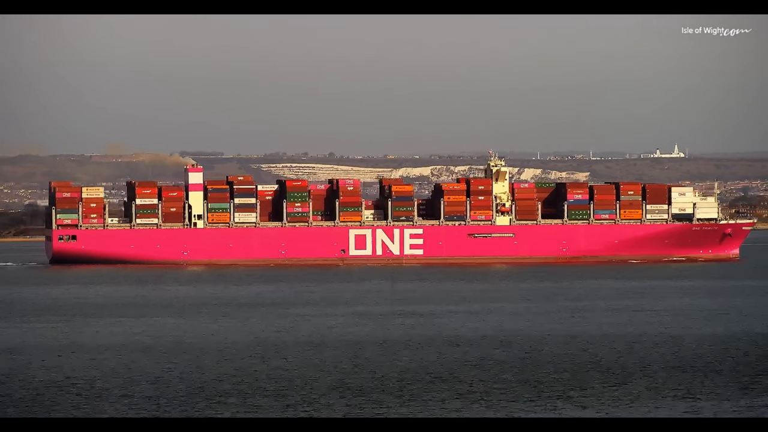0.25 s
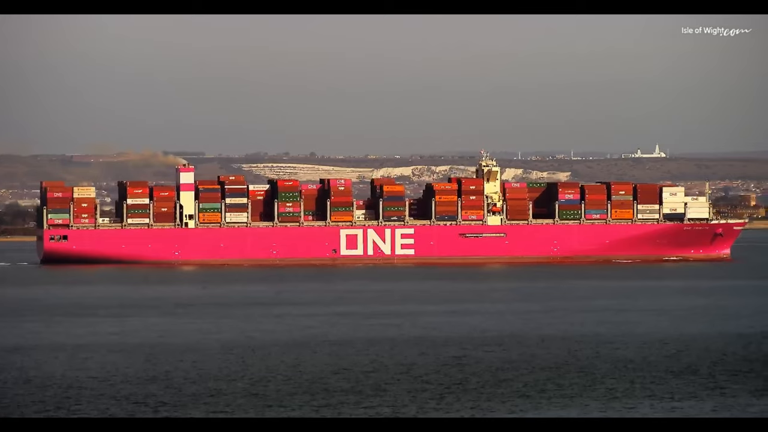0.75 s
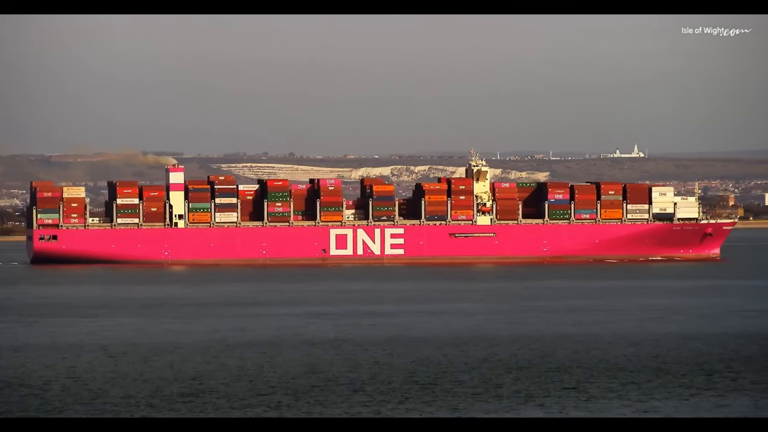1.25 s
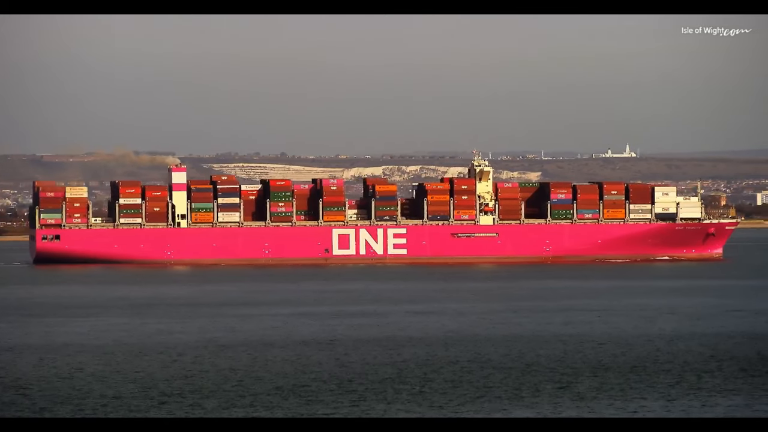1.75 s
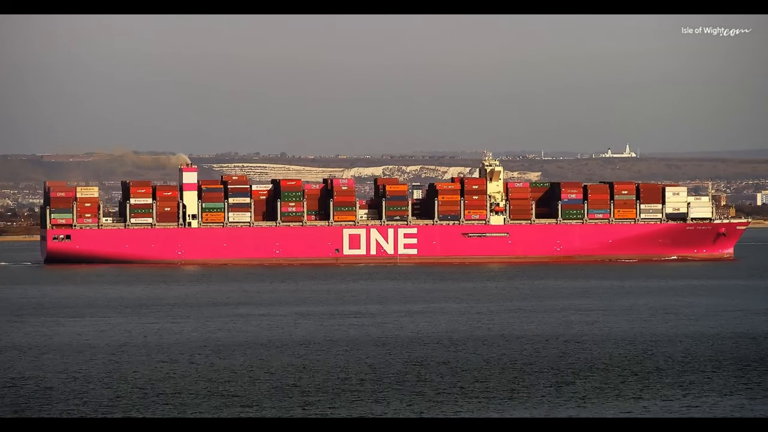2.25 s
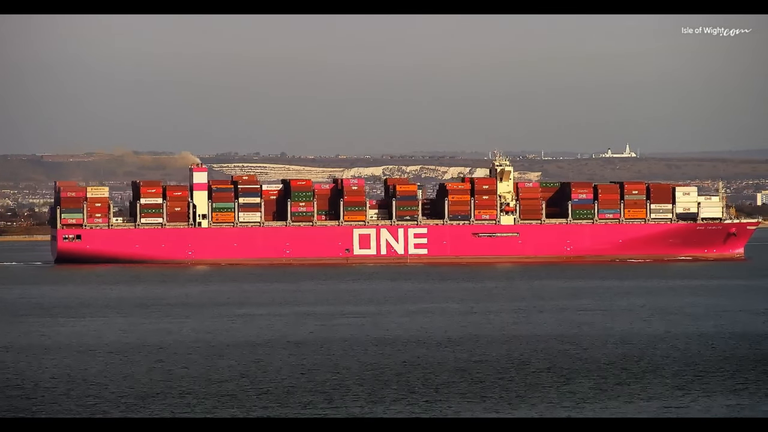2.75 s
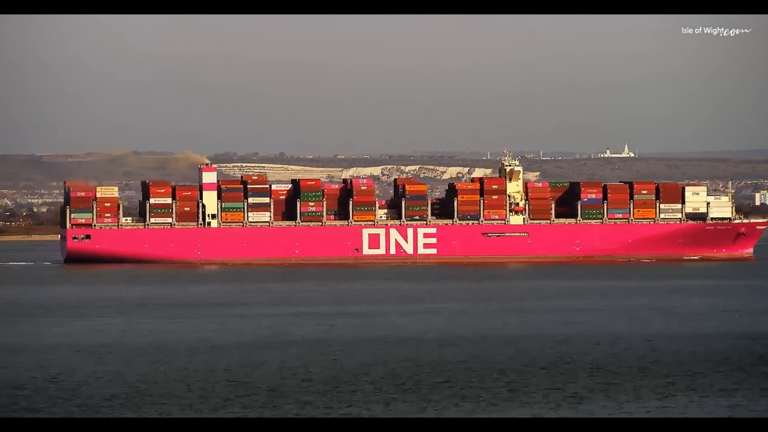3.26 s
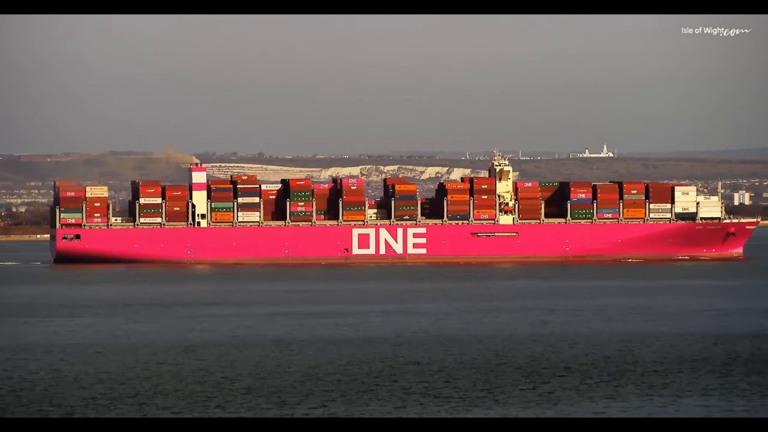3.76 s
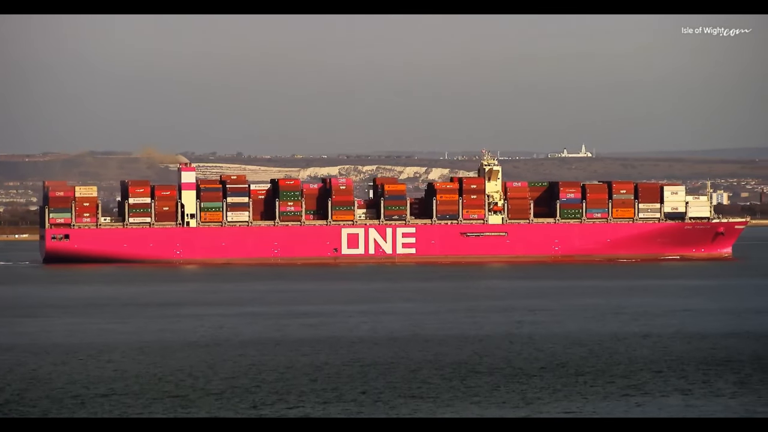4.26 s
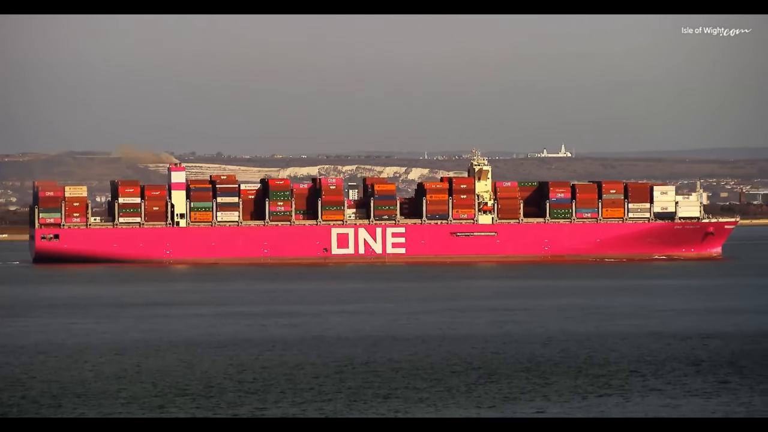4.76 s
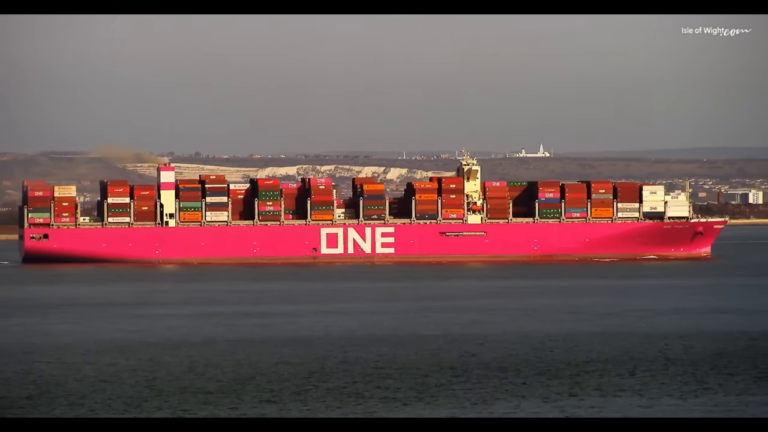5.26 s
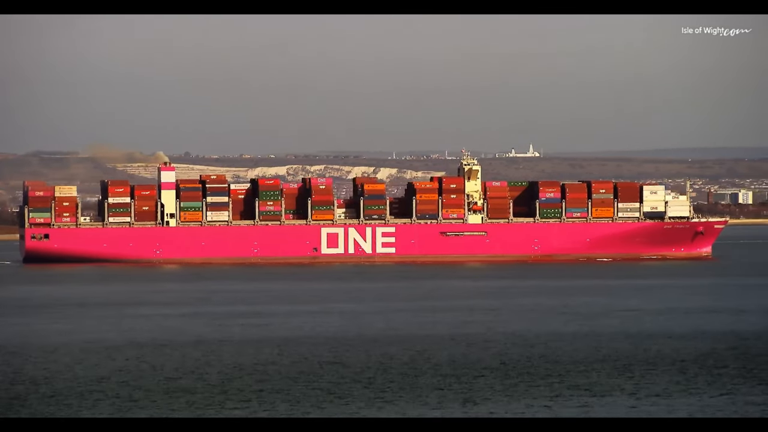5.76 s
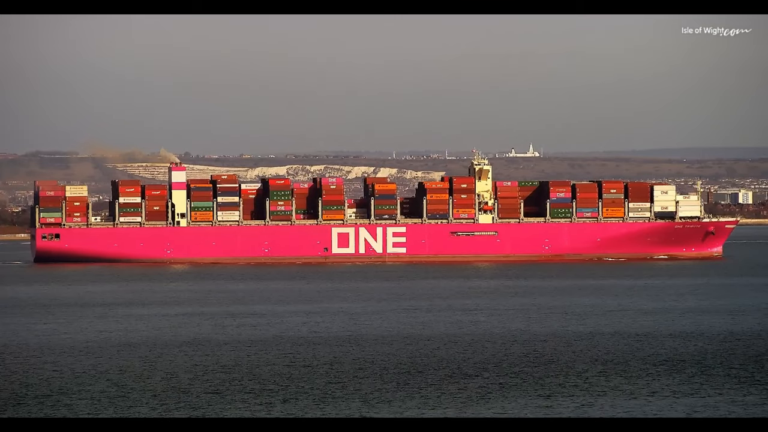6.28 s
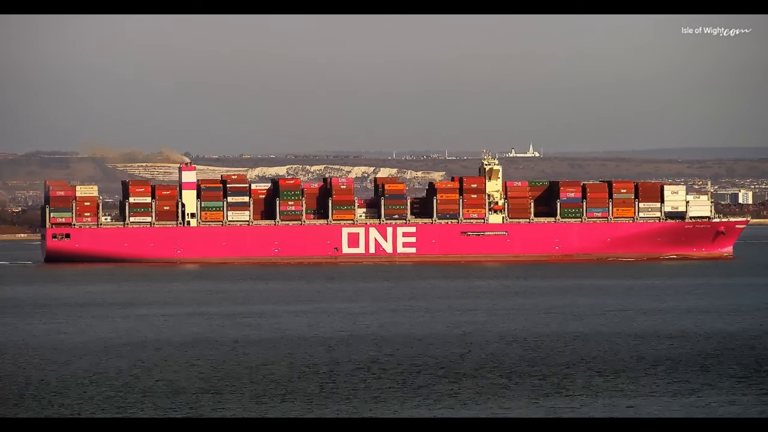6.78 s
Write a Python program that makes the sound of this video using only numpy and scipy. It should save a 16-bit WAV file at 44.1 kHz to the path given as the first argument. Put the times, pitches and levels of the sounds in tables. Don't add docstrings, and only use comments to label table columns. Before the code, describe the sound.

Outdoors, a continuous distant traffic bed: a steady low hum around 100 Hz, very slowly rising in pitch, over patchy rumble and dull tyre roar. Soft low exhaust booms and short drones come and go. Around three to four seconds a far van pulls away with muffled barks and the roar thickens slightly. The microphone is far from everything; treble is faint and dull.

```python
import sys
import numpy as np
from scipy import signal
from scipy.fft import rfft, irfft, next_fast_len
from scipy.io import wavfile
from scipy.ndimage import uniform_filter1d

SR = 44100
rng = np.random.default_rng(int(sys.argv[2]) if len(sys.argv) > 2 else 0)


def store_wav(level_fs):
    pcm = np.round(np.clip(np.atleast_2d(level_fs), -1, 1) * 32767)
    wavfile.write(sys.argv[1], SR, pcm.T.astype(np.int16))


def to_linear_factor(level_db):
    exponent = np.asarray(level_db, float) / 20
    return 10 ** exponent


N = 309582


def rms_one(x):
    return x / np.sqrt(np.mean(x ** 2) + 1e-20)


def in_time(rows):
    t_s, *columns = np.transpose(rows)
    return [np.interp(np.arange(N) / SR, t_s, column) for column in columns]


def drift(rate_hz):
    r = np.exp(-80 * np.pi * rate_hz / SR)
    slow = signal.lfilter([1], [1, -2 * r, r * r], rng.standard_normal(N // 40 + 2002))
    slow = rms_one(slow[2000:])
    return np.interp(np.arange(N) / 40, np.arange(len(slow)), slow)


def swells(rows):
    t_s = np.arange(0, N + 40, 40) / SR
    peak_s, rise_db, length_s = np.transpose(rows)[:, :, None]
    rise = np.sum(rise_db * np.exp(-4 * ((t_s - peak_s) / length_s) ** 2), axis=0)
    return np.interp(np.arange(N) / SR, t_s, rise)


def far_noise(spectrum, patchy_db, rate_hz, even_s, count):
    size = next_fast_len(N)
    hz, level_db = np.transpose(spectrum)
    octave = np.log2(np.arange(1, size // 2 + 2) * SR / size)
    gain = to_linear_factor(np.interp(octave, np.log2(hz), level_db, left=-150, right=-150))
    coloured = rfft(rng.standard_normal(size)) * gain
    centres = np.linspace(np.log2(hz[0]), np.log2(hz[-1]), count)
    spacing = centres[1] - centres[0]
    out = 0
    for centre in centres:
        share = np.clip(1 - abs(octave - centre) / spacing, 0, 1)
        band = irfft(coloured * share, size)[:N]
        out = out + band * to_linear_factor(patchy_db * drift(rate_hz))
    width = int(even_s * SR)
    power = uniform_filter1d(uniform_filter1d(rms_one(out) ** 2, width), width)
    return rms_one(out / np.sqrt(power + 0.038))


def pipe_tones(rows):
    out, unsteady_rad = np.zeros(N), 1.41 * drift(5.1)
    for (peak_s, hz, peak_db, length_s), start in zip(rows, rng.random(len(rows))):
        first = max(int((peak_s - length_s) * SR), 0)
        i = np.arange(first, min(int((peak_s + length_s) * SR), N))
        bell = np.exp(-4 * ((i / SR - peak_s) / length_s) ** 2)
        tone = np.sin(2 * np.pi * (hz * i / SR + start) + unsteady_rad[i])
        out[i] += np.sqrt(2) * to_linear_factor(peak_db) * bell * tone
    return out


def far_air(gaps_db, flutter_db):
    # f/Hz, level/dB
    air_spectrum = [(4000, -15.5), (5500, -4), (7500, -3), (10900, -4), (13000, -6)]
    hiss = far_noise(air_spectrum, patchy_db=.3, rate_hz=14.0, even_s=.3, count=3)
    return to_linear_factor(-82 + gaps_db + 2 * flutter_db) * hiss


def rumble(flow_db):
    # f/Hz, density/(dB per Hz)
    rumble_spectrum = [(4, -33), (10, -29), (17, -16), (23, -13.5), (29, -23), (33, -21.5), (39, -15),
                       (50, -10), (62, -9), (68, -16.5), (82, -17), (92, -16.5)]
    noise = far_noise(rumble_spectrum, patchy_db=3.5, rate_hz=4.7, even_s=0.062, count=4)
    return to_linear_factor(-33.5 + 0.87 * flow_db) * noise


def drone(flow_db):
    # f/Hz, density/(dB per Hz)
    drone_spectrum = [(70, -17), (90, -15.5), (100, -3.5), (112, 1.5), (124, -2), (135, -7.5), (155, -8),
                      (180, -11.5), (200, -10.5), (238, -15), (256, -10.5), (285, -13.5), (330, -12),
                      (385, -22.5), (450, -25.5)]
    # t/s, rise/dB, length/s
    pulls = [(.55, 1.5, 0.41), (.93, 5, 0.07), (1.2, 2, 0.48), (2.1, 1.5, 0.47), (3.13, 5.5, 0.12),
             (3.35, 4.5, 0.22), (3.78, 1, 0.3), (4.0, 0, 0.23), (4.55, 3.5, 0.31), (4.85, -0.5, 0.24),
             (5.3, 1, 0.44), (6.25, 2, 0.12), (6.72, 1, 0.43)]
    noise = far_noise(drone_spectrum, patchy_db=0.5, rate_hz=0.49, even_s=0.071, count=5)
    return to_linear_factor(-36.5 + flow_db + swells(pulls)) * noise


def road_roar(flow_db, gaps_db):
    # f/Hz, density/(dB per Hz)
    road_spectrum = [(300, -8.5), (400, 0.5), (490, -2), (554, -4.5), (657, -5), (852, -9), (960, -6.5),
                     (1060, -9.5), (1190, -12), (1380, -14.5), (1700, -14), (2170, -19.5), (2600, -33),
                     (4500, -63)]
    noise = far_noise(road_spectrum, patchy_db=.9, rate_hz=12.0, even_s=0.13, count=16)
    return to_linear_factor(-42.5 + flow_db + 0.82 * gaps_db) * noise


def tyre_swish(flow_db, gaps_db, flutter_db):
    # f/Hz, density/(dB per Hz)
    swish_spectrum = [(1700, -13.5), (2500, 2.5), (3100, -1.5), (4000, -6.5), (5000, -14), (6000, -19.5),
                      (7500, -24.5), (10900, -30.5), (13000, -39)]
    noise = far_noise(swish_spectrum, patchy_db=.35, rate_hz=14.0, even_s=.2, count=5)
    return to_linear_factor(-60 + 0.99 * flow_db + gaps_db + flutter_db) * noise


def alleys():
    # f/Hz, width/Hz, level/dB
    resonances = [(500, 42, -57.5), (990, 70, -58), (1056, 40, -61.5), (1467, 35, -65.5), (1561, 40, -68.5),
                  (1633, 40, -66.5), (1738, 40, -66), (1798, 40, -66.5), (1981, 90, -65), (2197, 95, -67.5)]
    flicker_db, wander_share = 2.0, .008
    out = 0
    for hz, width_hz, level_db in resonances:
        r = np.exp(-np.pi * width_hz / SR)
        poles = [1, -2 * r * np.cos(2 * np.pi * hz / SR), r * r]
        ringing = rng.standard_normal(N + SR)
        for _ in range(2):
            ringing = signal.lfilter([1, 0, -1], poles, ringing)
        read = np.cumsum(1 + wander_share * drift(1.5))
        wandering = rms_one(np.interp(read, np.arange(N + SR), ringing))
        out = out + to_linear_factor(level_db + flicker_db * drift(3.5)) * wandering
    return out


def treads():
    # t/s, f/Hz, peak/dB, length/s
    tread_tones = [(.3, 1040, -61, 0.11), (.72, 1005, -54, .12), (1.12, 1006, -49, 0.091),
                   (1.5, 955, -58, .15), (2.2, 1010, -50, .15), (2.7, 985, -55, .12), (2.7, 740, -48, 0.13),
                   (3.05, 950, -51, .12), (3.8, 1063, -57, .15), (3.9, 1750, -56, .15),
                   (4.45, 962, -50.5, .15), (4.5, 1740, -58, .12), (5.05, 1050, -58, 0.11),
                   (5.7, 1065, -53, .12), (6.05, 990, -57, .15), (6.75, 1040, -50, .12),
                   (6.97, 1740, -56, .06)]
    return pipe_tones(tread_tones)


def booms():
    # t/s, f/Hz, peak/dB, length/s
    boom_tones = [(.45, 50.6, -27, 0.13), (.9, 55, -33.5, 0.13), (1.3, 48, -36, 0.21),
                  (1.71, 48.24, -30, 0.2), (2.02, 57.1, -37, 0.22), (2.42, 56.4, -26.5, 0.18),
                  (2.7, 51.05, -29, 0.24), (2.94, 50.7, -38, 0.18), (3.11, 59, -36, 0.15),
                  (3.13, 25, -30, 0.14), (3.8, 47, -31, 0.32), (4.1, 54, -27.5, 0.061),
                  (4.42, 51.3, -29.5, 0.23), (4.52, 47.8, -34, 0.14), (4.63, 54.6, -28, 0.17),
                  (5.13, 50.3, -29, 0.17), (5.3, 51.9, -28, 0.13), (5.87, 54, -40.5, 0.27),
                  (6.32, 53, -30.5, 0.17), (6.63, 52.17, -34, 0.24), (6.9, 47, -30, 0.084)]
    return pipe_tones(boom_tones)


def further_barks():
    # t/s, f/Hz, peak/dB, length/s
    further_tones = [(.68, 272, -48, .08), (.9, 240, -42, 0.095), (1.13, 186, -43.5, 0.07),
                     (1.3, 275, -43.5, 0.23), (2.57, 274, -43, 0.048), (3.5, 410, -50, 0.31),
                     (4.0, 500, -49, .3), (6.05, 310, -48.5, 0.12), (6.87, 200, -38, 0.076),
                     (.15, 123.6, -41, 0.26), (.55, 126, -37.5, 0.38), (.93, 123.5, -45, 0.16),
                     (1.2, 124.8, -36, 0.16), (1.75, 127, -39, 0.14), (2.15, 124.6, -43, 0.22),
                     (2.62, 272, -46, 0.44), (2.6, 300.3, -42, 0.25), (3.2, 123, -34, 0.41),
                     (3.3, 155.3, -52, 0.15), (3.8, 162.2, -40, 0.22), (4.0, 130, -35, 0.18),
                     (4.3, 149.6, -42.5, 0.17), (4.85, 135.8, -36, 0.14), (5.1, 152.6, -41.5, 0.14),
                     (5.15, 205, -48, 0.13), (5.4, 128, -39, 0.41), (6.2, 124.6, -40, 0.2),
                     (6.35, 150.5, -37.5, 0.15), (6.65, 124, -34.5, 0.31)]
    return pipe_tones(further_tones)


def van_barks():
    # t/s, f/Hz, peak/dB, length/s
    bark_tones = [
        (3.05, 214, -36, 0.04),
        (3.07, 263.6, -37, 0.071),
        (3.23, 328, -41.5, 0.057),
        (3.43, 273, -40.5, 0.11),
        (3.57, 197.6, -41, 0.16),
        (3.76, 317, -43, 0.15),
        (3.92, 346.6, -41.5, 0.15),
        (4.09, 260, -42, 0.16),
        (4.18, 213.7, -41.5, 0.1),
    ]
    return pipe_tones(bark_tones)


def idling_lorry():
    # t/s, rise/dB, length/s
    idle_swells = [
        (.9, 4, 0.49),
        (1.78, 12, 0.27),
        (2.3, 4, 0.86),
        (3.8, 5, .8),
        (5.4, 8.5, 1),
        (6.3, 10, 0.41),
        (6.8, 14.5, 0.88),
    ]
    phase = 2 * np.pi * np.cumsum(32.55 + 0.78 * drift(1.66)) / SR
    return np.sqrt(2) * to_linear_factor(-48 + swells(idle_swells)) * np.sin(phase)


def engine():
    # t/s, speed/(cycles per s)
    engine_speed = [(0.0, 24.589), (1.0, 24.632), (2.0, 24.759), (3.0, 24.942), (4.0, 25.137),
                    (5.0, 25.302), (6.0, 25.412), (7.02, 25.474)]
    # t/s, level/dB
    hum_level = [(0, -32.5), (.6, -35), (1.0, -35), (1.8, -33), (2.5, -33), (3.1, -30.5), (3.5, -34.5),
                 (3.8, -35), (4.1, -32), (4.5, -31.5), (5.4, -32), (5.75, -28), (6.1, -32), (7.02, -32.5)]
    # order, early/dB, middle/dB, late/dB
    engine_orders = [(8, -56, -55, -53), (10, -67, -60, -56), (11, -47, -47, -59), (12, -53, -51, -56),
                     (13, -53, -52, -55), (17, -56, -57, -56), (19, -60, -52, -53), (20, -59, -54, -55),
                     (21, -59, -59, -57), (23, -62, -59, -58), (24, -63, -60, -59), (25, -65, -64, -61),
                     (26, -63, -58, -75), (27, -59, -66, -63), (28, -77, -61, -77), (30, -76, -65, -63),
                     (32, -78, -65, -64), (40, -65, -65, -77), (49, -74, -76, -77), (53, -75, -77, -86)]
    path_times_s = (1.25, 3.5, 5.6)
    second_order = [2, -55.5, -55.5, -55.5]
    cycles = np.cumsum(in_time(engine_speed)[0]) / SR
    hum = np.sin(8 * np.pi * (cycles + .003 * drift(3.0)))
    out = np.sqrt(2) * to_linear_factor(in_time(hum_level)[0] - 0.5) * hum
    for order, *levels_db in [second_order, *engine_orders]:
        level_db = in_time(np.transpose([path_times_s, levels_db]))[0]
        waver_db = 0.4 * np.sqrt(order) * drift(2.0)
        phase = 2 * np.pi * (order * cycles + rng.random() + .003 * order * drift(3.0))
        out = out + np.sqrt(2) * to_linear_factor(level_db + waver_db - 1.3) * np.sin(phase)
    return out


def scene():
    # t/s, level/dB
    traffic = [
        (0, -0.5),
        (1.1, -0.5),
        (2.2, 0),
        (3.2, -0.5),
        (3.8, 2),
        (5.1, 1.2),
        (5.8, 1),
        (6.5, -0.1),
        (7.02, 0),
    ]
    # t/s, rise/dB, length/s
    gaps = [(.65, 0.6, 0.11), (2.7, 1.5, 0.22), (3.05, 2, 0.083), (3.13, 0, 0.083), (3.37, 4, 0.071),
            (3.62, 2, 0.08), (3.7, 2, 0.073), (3.7, 0.8, .45), (4.06, 0.5, 0.092), (4.46, 1, 0.099),
            (4.86, 0, 0.072), (5.03, 1, 0.071), (5.17, 0.5, 0.065), (6.5, 1.5, 0.57)]
    flow_db, gaps_db = in_time(traffic)[0], swells(gaps)
    flutter_db = 0.4 * drift(16.0)
    treble = far_air(gaps_db, flutter_db) + tyre_swish(flow_db, gaps_db, flutter_db)
    low = rumble(flow_db) + drone(flow_db)
    road = road_roar(flow_db, gaps_db) + to_linear_factor(flow_db) * alleys() + treads()
    engines = booms() + further_barks() + van_barks() + idling_lorry() + engine()
    return (treble + low + road + engines)[None]


def band_gate(x, size=2048, count=13):
    # f/Hz, threshold re surroundings/dB
    gate_threshold = [(1800, -8), (4500, -4.5), (6500, -2.6), (9000, -1.2), (11000, -.6)]
    hz, _, cells = signal.stft(x, SR, nperseg=size, boundary="odd")
    band = np.arange(len(hz)) // count
    power = np.add.reduceat(abs(cells) ** 2, np.arange(0, len(hz), count), axis=0)
    usual = np.exp(uniform_filter1d(np.log(power + 1e-30), size=5, axis=0))
    around = np.exp(uniform_filter1d(np.log(usual), size=30, axis=1))
    usual = np.sqrt(usual * around)
    limit = to_linear_factor(2 * np.interp(hz[::count], *np.transpose(gate_threshold), left=-60))
    kept = np.where(power > usual * limit[:, None], 1, .08)
    cells[hz > 10900] = 0
    return signal.istft(cells * kept[band], SR, nperseg=size)[1][:N]


def top_cut(x):
    return signal.sosfilt(signal.butter(12, 15800, fs=SR, output="sos"), x)


def record(dry):
    start_offset = .085 * np.exp(-(np.arange(N) / SR / .0025) ** 2)
    low_pass = signal.ellip(10, .2, 60, 10950, fs=SR, output="sos")
    limited = signal.sosfilt(low_pass, band_gate(dry[0]) + start_offset)
    high_pass = signal.butter(6, 11800, "high", fs=SR, output="sos")
    hiss = to_linear_factor(-97) * signal.sosfilt(high_pass, rng.standard_normal(N))
    closing = signal.windows.hann(21)[np.minimum(np.arange(N)[::-1], 10)]
    return top_cut((limited * closing + hiss)[None])


dry = scene()
out = record(dry)
store_wav(out)
```